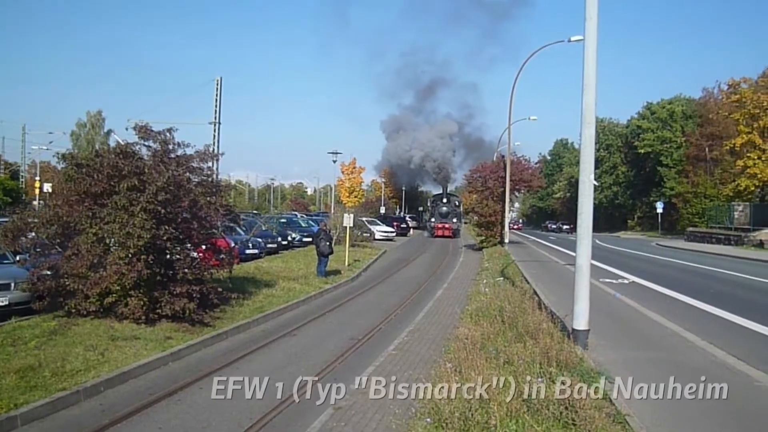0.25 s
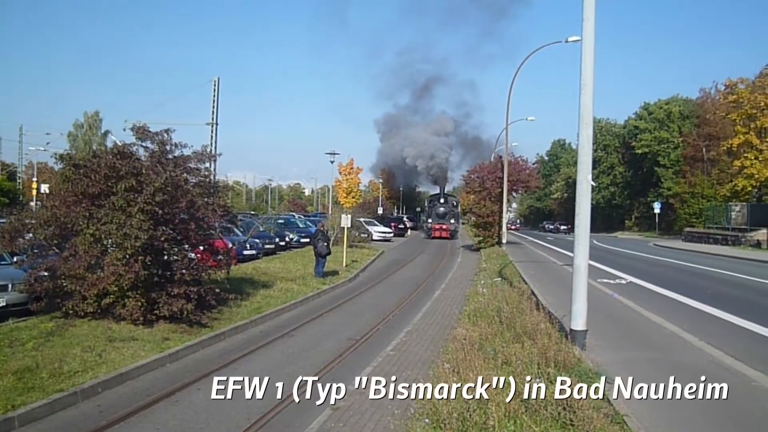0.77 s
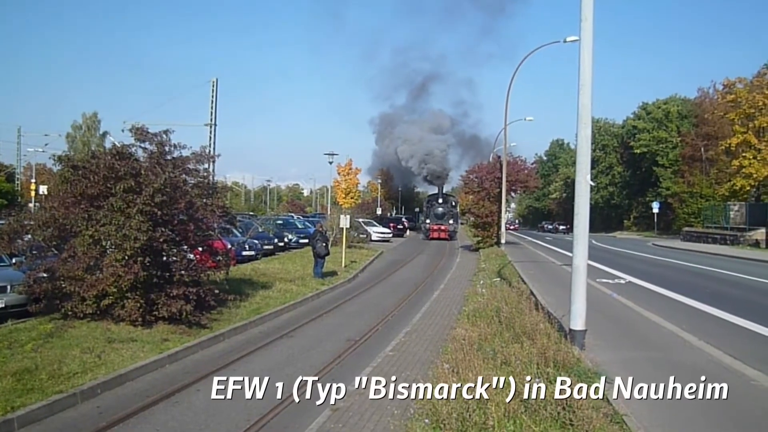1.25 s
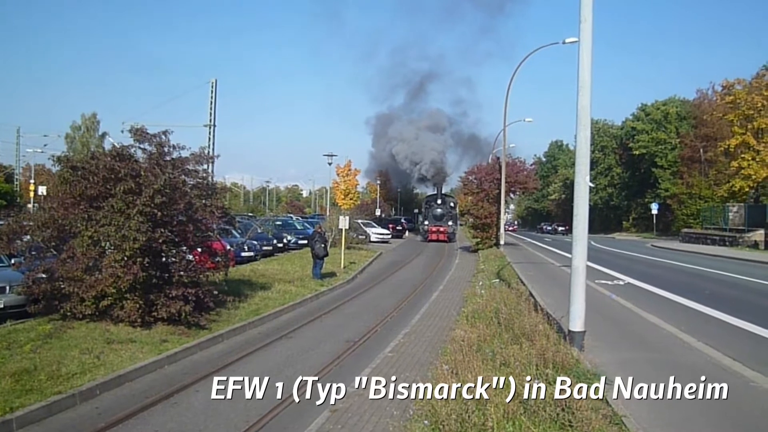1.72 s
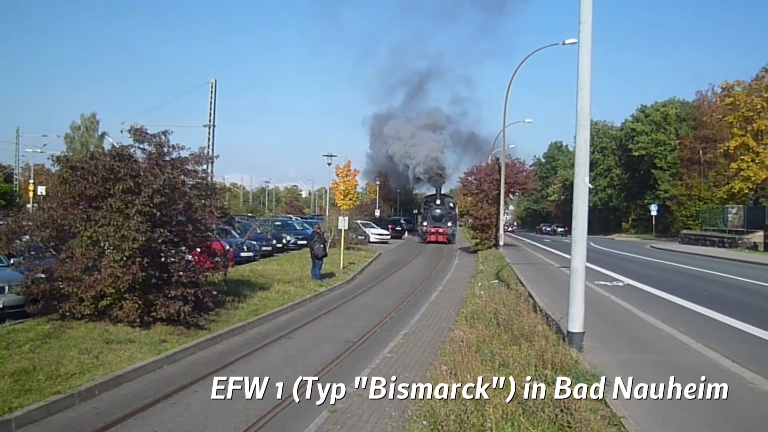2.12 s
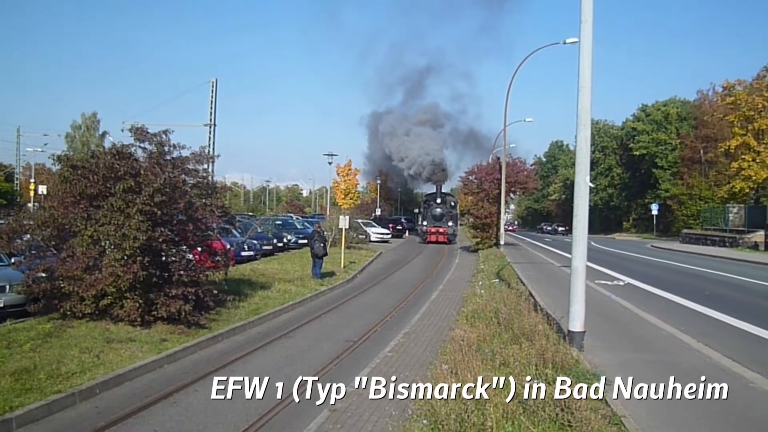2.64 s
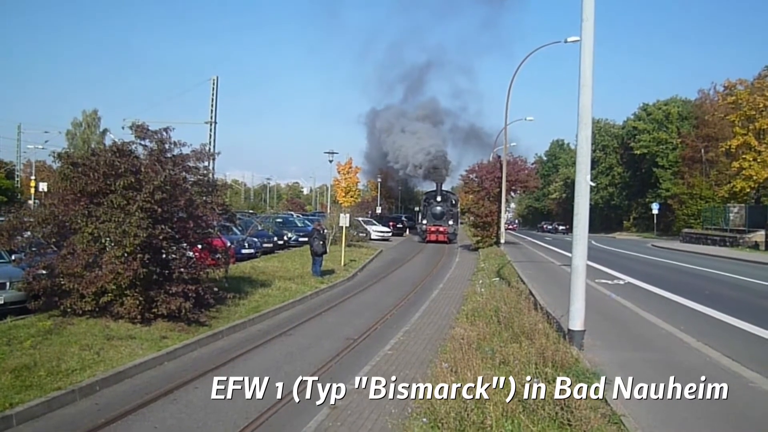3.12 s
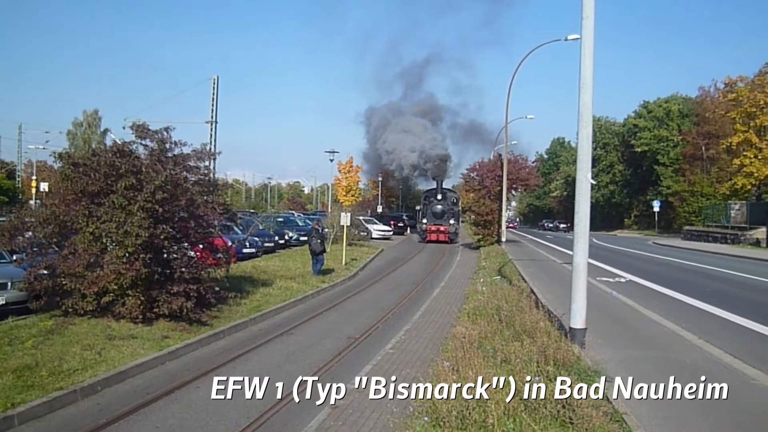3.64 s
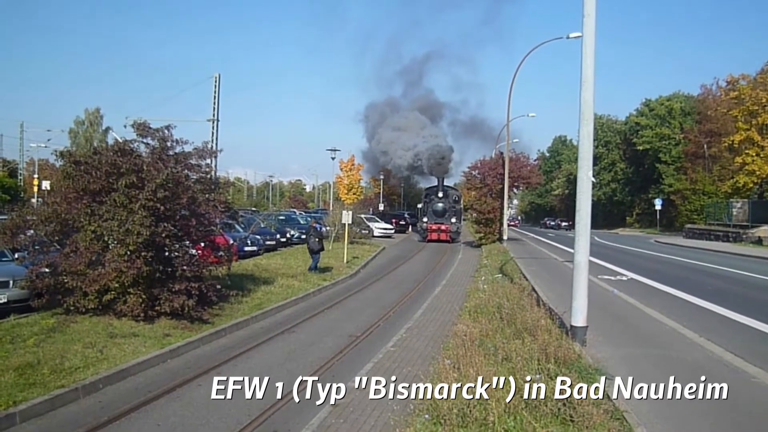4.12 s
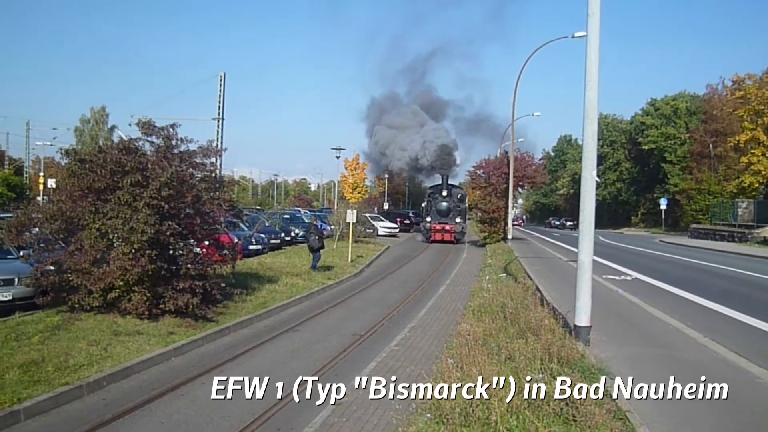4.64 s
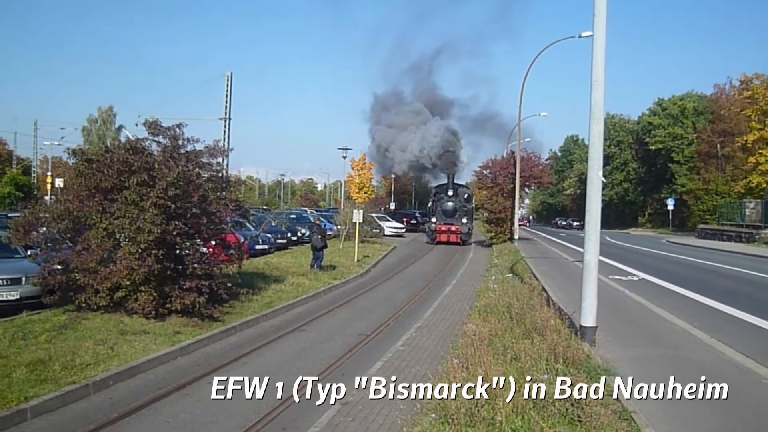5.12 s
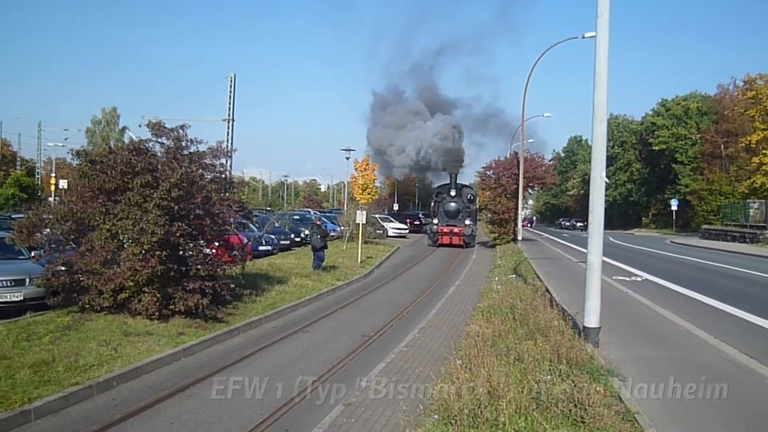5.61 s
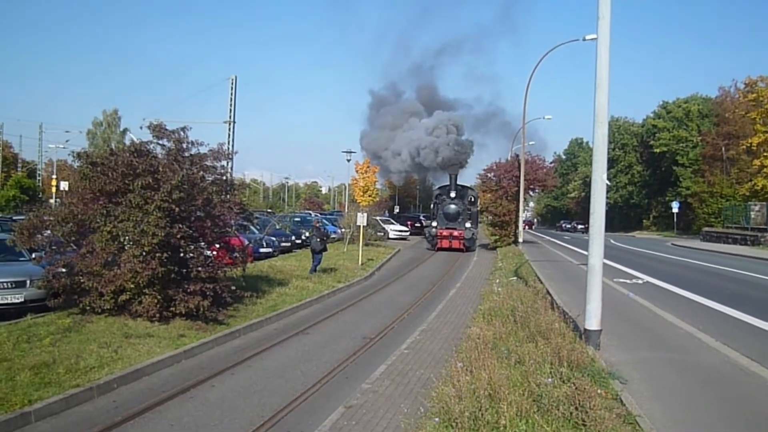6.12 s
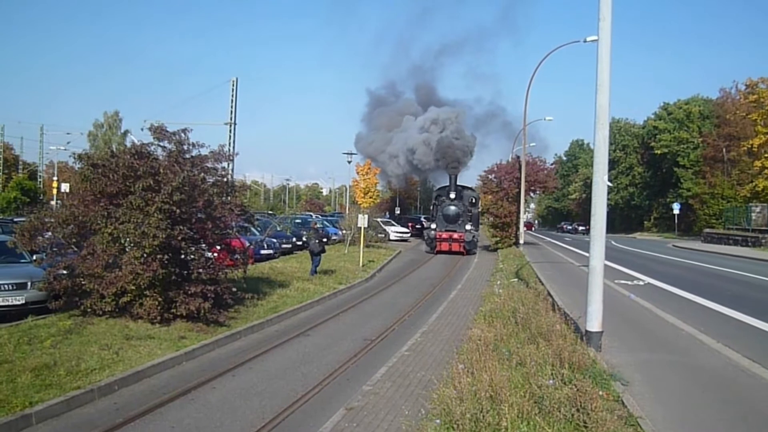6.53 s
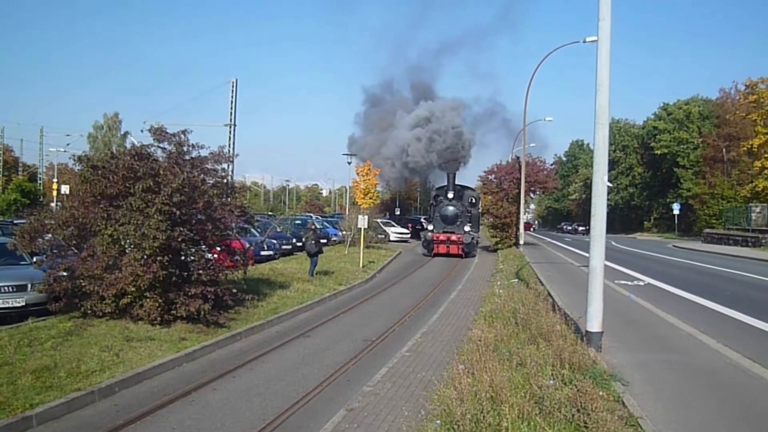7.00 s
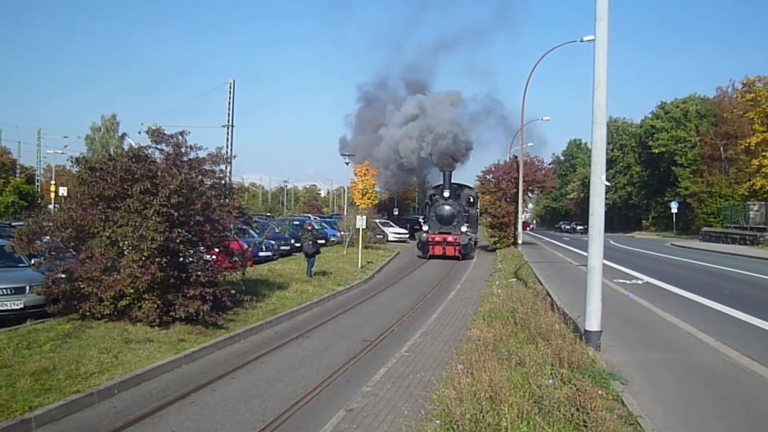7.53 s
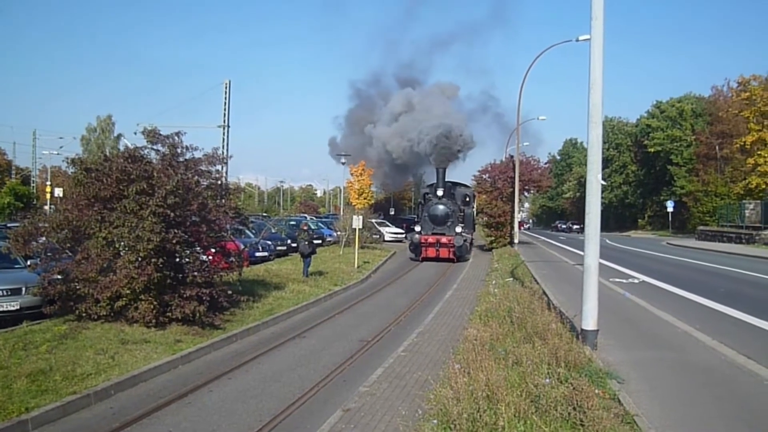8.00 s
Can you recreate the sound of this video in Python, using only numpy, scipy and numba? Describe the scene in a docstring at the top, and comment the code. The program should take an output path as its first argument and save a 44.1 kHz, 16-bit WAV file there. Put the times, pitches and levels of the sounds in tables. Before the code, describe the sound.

A small steam locomotive chuffs slowly closer and blows one loud, echoing whistle, with hissing steam and light wind.

```python
"""A small steam tank engine comes slowly up a roadside track, its exhaust beats quickening over rumble, leaking
steam and light wind. At 2.8 s its bell whistle chirps and holds one note, which ends at 4.3 s in a flat hoot
and rings on between houses and trees; the gain control ducks under it and recovers. Puffs of wind then knock on
the microphone, a faint high tone slides down, and the coupling rods knock as the engine draws nearer."""
import sys
import numpy as np
from scipy import signal
from scipy.fft import rfft, irfft, next_fast_len
from scipy.io import wavfile
from scipy.ndimage import map_coordinates
from numba import njit

SR = 44100
rng = np.random.default_rng(int(sys.argv[2]) if len(sys.argv) > 2 else 0)


def file_out(sig):
    """Save sig as 16-bit WAV at sys.argv[1]."""
    # one column per channel
    cols = np.atleast_2d(sig).T
    # limit, then scale
    lim = np.clip(cols, -1, 1)
    pcm = np.round(lim * 32767).astype(np.int16)
    wavfile.write(sys.argv[1], SR, pcm)


N = 364266
START_M, SPEED_M_S = 63, 3.8  # engine approach
OPEN_S, SHUT_S = 2.792, 4.307  # whistle valve


def undb(db):
    """Decibels to gain."""
    return 10 ** (np.asarray(db) / 20)


def seconds():
    """Time of every sample."""
    return np.arange(N) / SR


def curves(rows):
    """Each table column, interpolated linearly over time."""
    times, *columns = np.transpose(rows)
    return [np.interp(seconds(), times, column) for column in columns]


def shaped(gain_at):
    """Unit-rms noise with a given relative gain at each frequency."""
    size = next_fast_len(N)
    hz = np.maximum(np.fft.rfftfreq(size, 1 / SR), 1)
    x = irfft(rfft(rng.standard_normal(size)) * gain_at(hz), size)[:N]
    return x / np.sqrt(np.mean(x ** 2))


def noise(spectrum):
    """Unit-rms noise from (frequency [Hz], relative density [dB]) points."""
    hz, db = np.transpose(spectrum)
    return shaped(lambda f: undb(np.interp(np.log(f), np.log(hz), db)))


def resonant(modes):
    """Unit-rms noise in steep resonances: (frequency [Hz], width [Hz], relative level [dB])."""
    return shaped(lambda f: sum(undb(db) / (1 + ((f * f - hz * hz) / (f * width_hz * np.sqrt(2))) ** 2)
                                for hz, width_hz, db in modes))


def walk(rate_hz):
    """Random drift of spread near 1, mostly below rate_hz."""
    points = rng.standard_normal(8192)
    return np.sqrt(1.5) * np.interp(seconds() * rate_hz * 2, np.arange(len(points)), points)


def bursts(times, dbs, rise_s, hold_s, fall_s):
    """Envelope of bursts: linear rise, exponential fall from hold_s after each onset."""
    out = np.zeros(N)
    for onset_s, db in zip(times, dbs):
        span = np.arange(max(int(onset_s * SR), 0), min(int((onset_s + 1) * SR), N))
        age = span / SR - onset_s
        out[span] += undb(db) * np.clip(age / rise_s, 0, 1) * np.exp(-np.maximum(age - hold_s, 0) / fall_s)
    return out


def approach(far_db, near_db):
    """Level in dB, moving from far to near with the log of the distance."""
    closer = np.log(START_M / (START_M - SPEED_M_S * seconds()))
    return far_db + (near_db - far_db) * closer / closer[-1]


def doppler(x, heading):
    """Lowers sound sent sideways or backwards from the engine; heading 1 is ahead, -1 behind."""
    rate = 1 - (1 - heading) * SPEED_M_S / 343
    return map_coordinates(x, [(SHUT_S + (seconds() - SHUT_S) * rate) * SR], order=1)


# exhaust beats: (time [s], relative hiss [dB], relative body [dB])
BEATS = [(-0.024, -5, 1), (0.222, -1.5, 0), (0.472, -1, 0), (0.72, -3.5, 0), (0.974, -1, 2),
         (1.223, -1.5, 0), (1.465, 1, 1), (1.713, -4, -1), (1.961, 0, 2.5), (2.205, -3, -0.5),
         (2.444, 0, 1), (2.688, -6.5, -0.5), (2.93, -3, -6), (3.172, 0, -1), (3.412, -9, 8.5),
         (3.652, -14, 11), (3.891, -6, -10), (4.13, -7.5, -1), (4.368, -2, 7), (4.605, -3, 3.5),
         (4.841, -3, -0.5), (5.077, -2, -1), (5.312, -1.5, -0.5), (5.546, -4, 0.5), (5.78, -1, 0),
         (6.012, 0, 2), (6.242, 1.5, 2.5), (6.474, -2.5, 1), (6.706, 0.5, 2), (6.935, -1, 1.5),
         (7.161, 0.5, 0.5), (7.39, -4.5, 0), (7.62, -0.5, 2), (7.846, -5, 0.5), (8.071, 0.5, 0)]
# blast nozzle resonances: (frequency [Hz], width [Hz], relative level [dB])
NOZZLE_MODES = [(2000, 490, -9), (3490, 190, 1), (3810, 120, -6), (4030, 90, -2), (4490, 110, -3),
                (5030, 200, -5), (5280, 180, -6), (5800, 450, -7.5), (6560, 280, -8.5), (7120, 170, -14)]
# blast pipe and chimney resonances: (frequency [Hz], width [Hz], relative level [dB])
CHIMNEY_MODES = [(590, 110, 0.5), (796, 270, -2.5), (1390, 230, -1.5), (1902, 65, 1), (2062, 90, 1.5),
                 (2596, 120, -0.5), (3137, 76, -4.5)]


def exhaust():
    """Each beat is a steam jet up the chimney: nozzle hiss, longer pipe ring, hollow bark at the mouth."""
    times, hiss_db, body_db = np.transpose(BEATS)
    hiss = resonant(NOZZLE_MODES) * bursts(times, hiss_db, rise_s=.021, hold_s=.031, fall_s=.03)
    body = resonant(CHIMNEY_MODES) * bursts(times, body_db, rise_s=.016, hold_s=.032, fall_s=.044)
    mouth = resonant([(201, 140, .23), (573, 100, -1.5), (748, 120, -1.7)])
    bark = mouth * bursts(times, body_db, rise_s=.035, hold_s=.062, fall_s=.036)
    beats = hiss * undb(-39.5) + body * undb(approach(-36, -35)) + bark * undb(approach(-42, -31.5))
    return beats * undb(.37 * walk(48))


# rumble and rolling noise, swelling around 5.5 s: (time [s], rumble [dB], rolling [dB])
RUMBLE_ROLL_LEVELS = [(0, -34, -41), (1.1, -31.5, -39.5), (2.7, -33, -38), (5.1, -32, -39.5),
                      (5.45, -26.5, -36.5), (6, -32, -36), (6.5, -28, -36), (7, -30.5, -36.5),
                      (8.26, -29.5, -36)]
# boiler draught and running gear: (frequency [Hz], relative density [dB])
RUMBLE_SPECTRUM = [(20, -30), (40, -16.5), (70, -7.5), (140, 4), (220, 0.5), (310, 0.5), (380, -10.5),
                   (500, -14.5), (800, -40), (2000, -49.5)]
# wheels on rails, road traffic: (frequency [Hz], relative density [dB])
ROLL_SPECTRUM = [(200, 0.5), (450, -3), (680, 2), (1000, -4.5), (1700, -8.5), (1950, -7), (2250, -12),
                 (2700, -8.5), (3000, -13), (3250, -13), (4000, -20.5), (8000, -33.5)]


def running_gear(sway_db):
    """Draught and gear rumble while the wheels roll on the rails."""
    rumble_db, roll_db = curves(RUMBLE_ROLL_LEVELS)
    rumble = noise(RUMBLE_SPECTRUM) * undb(rumble_db + 1.4 * walk(21))
    roll = noise(ROLL_SPECTRUM) * undb(roll_db + sway_db)
    return rumble + roll


# cylinder leak: (frequency [Hz], relative density [dB])
LEAK_SPECTRUM = [(1000, -11.5), (2200, -6), (2600, 10), (2950, -8), (3250, 0), (4300, 0.5), (5000, 1),
                 (5800, 3), (6500, -2.5), (8000, -5.5)]
# drain pipe resonances: (frequency [Hz], width [Hz], relative level [dB])
DRAIN_MODES = [(1900, 100, -2.5), (2575, 110, 0.5), (3245, 75, 3.5), (4500, 62, -7), (5790, 290, -2)]


def steam_leak(sway_db):
    """Steam escapes at the cylinders and rings in the drain pipes."""
    leak = noise(LEAK_SPECTRUM) * undb(approach(-52, -45.5) + 1.6 * sway_db)
    drains = resonant(DRAIN_MODES) * undb(approach(-59, -49.5) + 1.5 * walk(3))
    return leak + drains


# engine whines: (frequency [Hz], far level [dB], near level [dB])
WHINES = [(597, -56, -47), (1547, -59.5, -61.5)]


def whines():
    """Faint engine tones, wavering slightly in pitch and level."""
    out = 0
    for hz, far_db, near_db in WHINES:
        phase = 2 * np.pi * np.cumsum(hz * (1 + .003 * walk(9.2))) / SR
        out += np.sqrt(2) * undb(approach(far_db, near_db) + 1.3 * walk(3)) * np.sin(phase)
    return out


# gusts: (peak time [s], 1/e half-width [s], level [dB])
GUSTS = [(2.502, 0.59, -38.5), (4.547, 0.31, -33.5), (5.594, 0.5, -35), (6.394, 0.23, -42.5),
         (7.23, 0.5, -34.5), (8, 0.092, -35)]


def wind():
    """Light air and gusts flutter on the microphone."""
    calm_db = -56.5
    gusts = sum(undb(db) * np.exp(-((seconds() - peak_s) / half_s) ** 2) for peak_s, half_s, db in GUSTS)
    buffet = noise([(20, -10.5), (40, -13), (75, -1), (130, -5), (300, -23), (1000, -60)])
    return buffet * (undb(calm_db) + gusts) * undb(2 * walk(28))


def gland_spurt():
    """One short spurt of steam from a valve gland."""
    envelope = bursts(times=[1.652], dbs=[-47], rise_s=.002, hold_s=.0061, fall_s=.016)
    return resonant([(5630, 820, 0)]) * envelope * undb(.37 * walk(48))


def whistle_chirp():
    """The first jet spits and, too fast for the fundamental, sounds the bell's next mode."""
    mode = np.sin(2 * np.pi * 1900 * seconds())
    chirp = mode * bursts([OPEN_S], [-4], rise_s=.002, hold_s=.007, fall_s=.003)
    jet = resonant([(2700, 320, 0), (4130, 670, -1.5), (6040, 200, 1)])
    spit = jet * bursts([OPEN_S - .004], [-23], rise_s=.0063, hold_s=.021, fall_s=.002)
    return chirp + spit


# pitch, rising as the bell warms: (time [s], frequency [Hz])
WHISTLE_PITCH = [(2.8, 723.2), (3.03, 724.3), (3.15, 730.7), (3.45, 736.7), (3.75, 738.6), (4.12, 743),
                 (4.3, 739.8)]
# steam pressure at the valve: (time [s], gain [dB])
VALVE_GAIN = [(2.8, 15), (3.25, 16.5), (3.7, 23.5), (4.3, 22)]
# steam rush through the bell: (time [s], relative level [dB])
RUSH_LEVEL = [(2.82, -47), (2.97, -48), (3.06, -53.5), (3.13, -46), (3.27, -47), (3.45, -52.5), (3.53, -48),
              (3.62, -49), (3.73, -57), (3.85, -52.5), (3.96, -57.5), (4.24, -53), (4.3, -52.5)]
# colour of that rush: (frequency [Hz], relative density [dB])
RUSH_SPECTRUM = [(350, -14.5), (520, -10), (660, 1.5), (830, 5), (1020, -8), (1300, -2), (1700, -15),
                 (2070, 3.5), (2350, -14.5), (2800, -8.5), (3150, -15), (3700, -12), (5000, -15.5),
                 (7500, -18.5)]


def whistle():
    """Steam blows one nearly pure note on the bell; it sags and dies as the valve shuts."""
    (hz,), (valve_db,), (rush_db,) = curves(WHISTLE_PITCH), curves(VALVE_GAIN), curves(RUSH_LEVEL)
    opening = np.clip((seconds() - OPEN_S) / .012, 0, 1)
    since_shut_s = np.maximum(seconds() - SHUT_S, 0)
    sag = 1 - .13 * np.clip(since_shut_s / .02, 0, 1)
    phase = 2 * np.pi * np.cumsum(hz * sag * (1 + .0014 * walk(90))) / SR
    note = np.sqrt(2) * undb(-11) * np.imag(ground_echo() * np.exp(1j * phase))
    tone = (note + overtones(phase, rush_db)) * np.exp(-since_shut_s / .007)
    steam = noise(RUSH_SPECTRUM) * undb(rush_db + 12 + 2.1 * walk(25)) * np.exp(-since_shut_s / .035)
    return (tone + steam) * opening * undb(valve_db)


# second harmonic: (time [s], relative level [dB])
OCTAVE_LEVEL = [(2.82, -34), (2.864, -27), (3.016, -35), (3.054, -42), (3.086, -33.5), (3.166, -23.5),
                (3.214, -29), (3.298, -39), (3.524, -28.5), (3.61, -32), (3.672, -50.5), (3.78, -30.5),
                (3.854, -34.5), (3.966, -48), (4.06, -40.5), (4.102, -41), (4.168, -32.5), (4.3, -34)]
# third harmonic: (time [s], relative level [dB])
TWELFTH_LEVEL = [(2.82, -37), (2.93, -32.5), (3.08, -45), (3.12, -33.5), (3.33, -39.5), (3.45, -50),
                 (3.51, -36.5), (3.62, -34), (3.67, -46), (3.72, -39), (3.95, -53), (4.0, -37.5),
                 (4.11, -40), (4.3, -38)]
# weak harmonics that follow the rush: (harmonic number, relative level [dB])
HIGH_HARMONICS = [(4, 2), (5, -1.5), (6, -4.5), (7, -18), (8, -14)]


def overtones(phase, rush_db):
    """The whistle's harmonics swell and sink; turbulence shakes the higher ones more."""
    trim_db = -1
    (octave_db,), (twelfth_db,) = curves(OCTAVE_LEVEL), curves(TWELFTH_LEVEL)
    harmonics = [(2, octave_db + walk(15)), (3, twelfth_db + 3 * walk(20))]
    harmonics += [(k, rush_db + db + 2 * walk(15)) for k, db in HIGH_HARMONICS]
    out = 0
    for k, db in harmonics:
        jitter_rad = .02 * (k - 1) * walk(58)
        out += np.sqrt(2) * undb(db + trim_db) * np.sin(k * phase + jitter_rad)
    return out


# diffuse tail: (low edge [Hz], high edge [Hz], relative level [dB], t60 [s])
SCATTER_BANDS = [(302, 980, -19, 2.73), (1020, 2120, -11.5, 2.2), (2030, 2850, -5.5, 2.19),
                 (2600, 7700, -2, 1.23)]
# paths into the scatter: (heading [1 ahead, -1 behind], gain [dB])
SCATTER_PATHS = [(1, -3.5), (0, -4.5), (-1, -8)]


def scatter(x):
    """Parked cars, house fronts and trees return each heading at its own pitch, so the echoes beat."""
    age = seconds()[:3 * SR]
    out = 0
    for heading, path_db in SCATTER_PATHS:
        tail = 0
        for low_hz, high_hz, db, t60_s in SCATTER_BANDS:
            band = signal.butter(2, [low_hz, high_hz], "band", fs=SR, output="sos")
            wash = signal.sosfilt(band, rng.standard_normal(len(age)))
            decay = 1000 ** (-age / t60_s) * np.clip(age / .04, 0, 1)
            tail += undb(db) * wash * decay / np.linalg.norm(decay)
        out += undb(path_db) * signal.fftconvolve(doppler(x, heading), tail)[:N]
    return out


# wall echoes: (delay [s], heading [1 ahead, -1 behind], low edge [Hz], high edge [Hz], gain [dB])
WALLS = [(.28, 1, 2126, 4740, -8.5), (.32, -0.43, 647, 1700, -25), (.56, 0.902, 706, 1695, -23.5),
         (1.01, -0.417, 690, 1700, -37), (1.35, .8, 603, 1100, -45), (2.13, 0.316, 513, 1110, -48.5)]


def wall_echoes(x):
    """Single walls return the note, each with its own delay, pitch and colour, so the tail throbs."""
    out = 0
    for delay_s, heading, low_hz, high_hz, db in WALLS:
        echo = np.interp(seconds() - delay_s, seconds(), doppler(x, heading), left=0)
        band = signal.butter(4, [low_hz, high_hz], "band", fs=SR, output="sos")
        out += undb(db) * signal.sosfilt(band, echo)
    return out


# fades of the note: (time [s], half-width [s], depth [dB])
FADES = [(3.12, .012, 3.5), (3.607, .02, 5.5), (3.816, .028, 5.5), (4.035, .085, 7), (4.228, .026, 9.5)]


def ground_echo():
    """Complex gain: the shifting ground reflection partly cancels the note; level dips, pitch flicks."""
    gain = 1
    for time_s, half_s, depth_db in FADES:
        gain *= 1 - (1 - undb(-depth_db)) / (1 + 1j * (seconds() - time_s) / half_s)
    return gain


def whistle_hoot():
    """With the pressure gone, the bell hoots flat for an instant."""
    tone = np.sin(2 * np.pi * 724 * seconds())
    breath = undb(-18) * resonant([(685, 33, 0)])
    return (tone + breath) * bursts([SHUT_S + .0058], [3.5], rise_s=.0084, hold_s=.024, fall_s=.057)


# wind puffs: (time [s], frequency [Hz], envelope peak [dB])
PUFFS = [(4.495, 110, -14), (4.733, 220, -9), (4.8, 230, -16), (4.822, 130, -18), (4.915, 220, -10),
         (5.378, 170, -19), (5.445, 150, -17), (5.509, 140, -13), (5.521, 165, -6), (5.65, 150, -15),
         (5.722, 190, -9), (5.838, 225, -5)]


def wind_puffs():
    """Each strong eddy hits the microphone as a single swing of pressure."""
    out = np.zeros(N)
    for time_s, hz, db in PUFFS:
        cycles = (seconds() - time_s) * hz
        out -= undb(db) * np.cos(2 * np.pi * cycles + rng.uniform(-1, 1)) * np.exp(-(cycles / .6) ** 2)
    return out


def falling_tone():
    """One short, faint, unsteady high tone sliding down."""
    onset_s, length_s, start_hz, end_hz = 5.65, .15, 2710, 2520
    progress = np.clip((seconds() - onset_s) / length_s, 0, 1)
    hz = (start_hz + (end_hz - start_hz) * progress) * (1 + .0058 * walk(140))
    return undb(-44) * np.sqrt(2) * np.sin(np.pi * progress) * np.sin(2 * np.pi * np.cumsum(hz) / SR)


# rod knocks: (time [s], level [dB])
KNOCKS = [(5.978, -38), (6.89, -33), (7.533, -35.5), (7.803, -36)]
# rod resonances: (frequency [Hz], width [Hz], relative level [dB])
ROD_MODES = [(780, 180, 5), (1420, 170, -3), (2150, 100, -4.5), (2800, 500, -27)]


def rod_knocks():
    """The coupling rods knock and ring briefly."""
    return resonant(ROD_MODES) * bursts(*np.transpose(KNOCKS), rise_s=.0083, hold_s=.037, fall_s=.023)


def scene():
    """Engine, wind and the whistle with its echoes, in mono."""
    sway_db = walk(8)  # shared by rolling and leak
    engine = exhaust() + running_gear(sway_db) + steam_leak(sway_db) + whines() + gland_spurt()
    note = whistle()
    blast = whistle_chirp() + note + whistle_hoot()
    echoes = scatter(blast) + wall_echoes(note)
    return (engine + wind() + blast + echoes + wind_puffs() + falling_tone() + rod_knocks())[None]


@njit
def gain_control(x, ceiling, attack_s, release_s):
    """Gain drops fast when a peak passes the ceiling, then creeps back."""
    y, cut = np.empty(len(x)), 0.
    for i in range(len(x)):
        y[i] = x[i] * np.exp(-cut)
        if abs(y[i]) > ceiling:
            cut += np.log(abs(y[i]) / ceiling) / (attack_s * SR)
        cut -= cut / (release_s * SR)
    return y


def record(dry):
    """Slow gain control, quick limiter, two treble cuts and the converter's DC offset."""
    ceiling, dc_offset = float(undb(-7.5)), .025
    ridden = gain_control(dry[0], ceiling, attack_s=.0008, release_s=.85)
    limited = gain_control(ridden, ceiling, attack_s=.0008, release_s=.04)
    rolloff = signal.butter(8, 11000, fs=SR, output="sos")
    steep_cut = signal.ellip(8, .2, 33, 7540, fs=SR, output="sos")
    return signal.sosfilt(steep_cut, signal.sosfilt(rolloff, limited))[None] + dc_offset


dry = scene()
out = record(dry)
file_out(out)
```